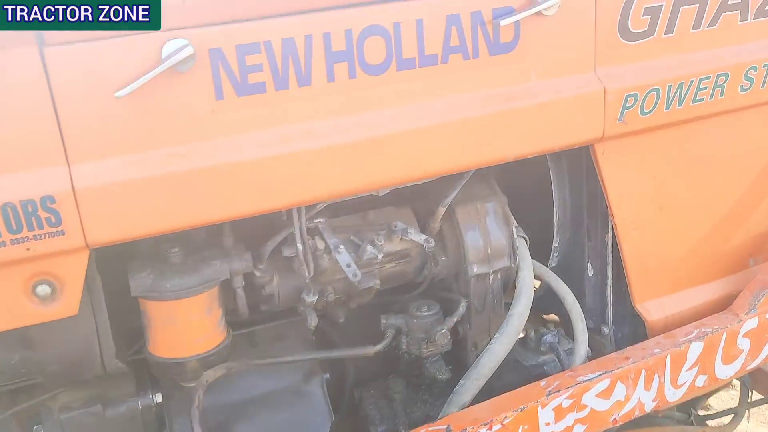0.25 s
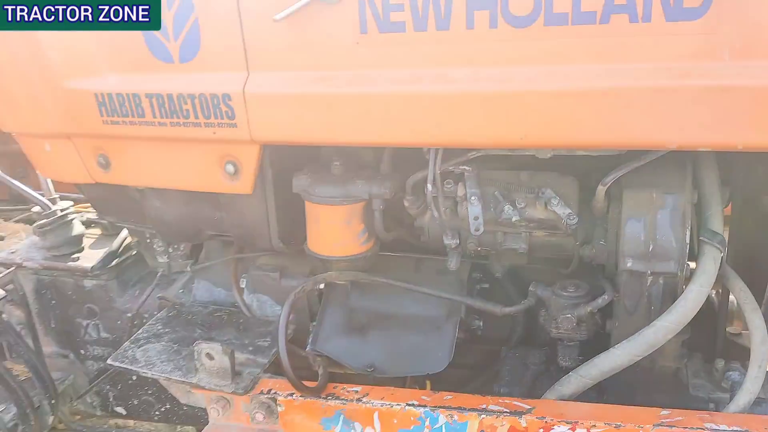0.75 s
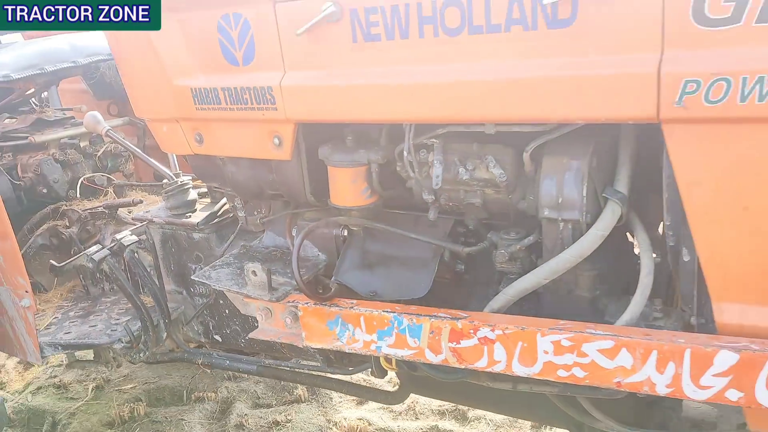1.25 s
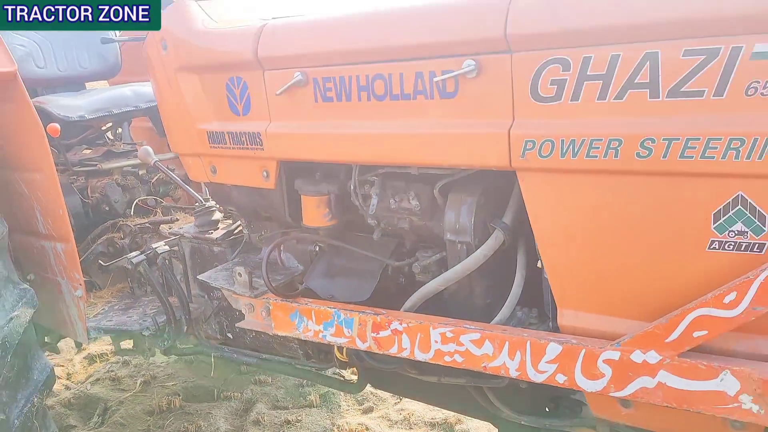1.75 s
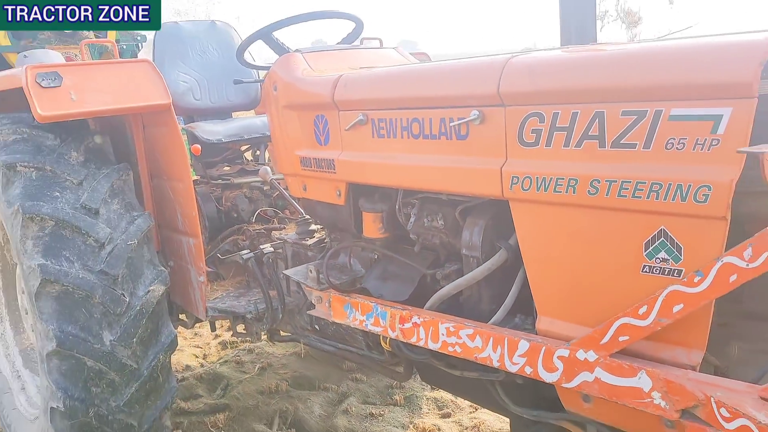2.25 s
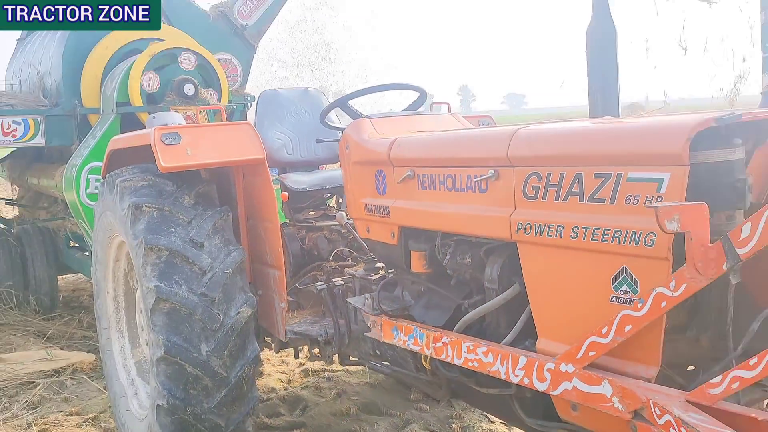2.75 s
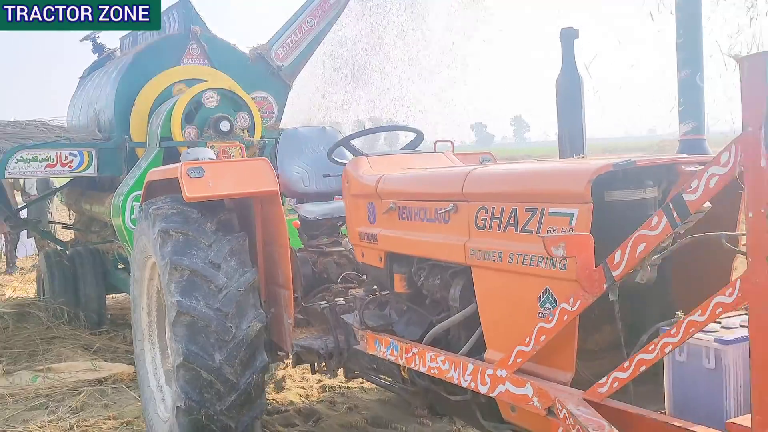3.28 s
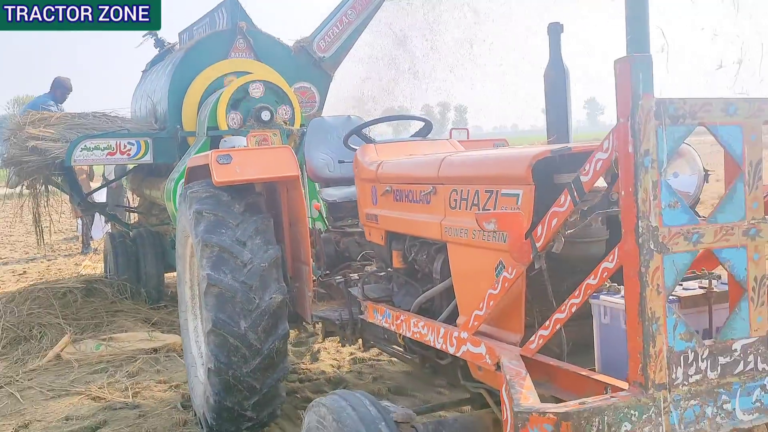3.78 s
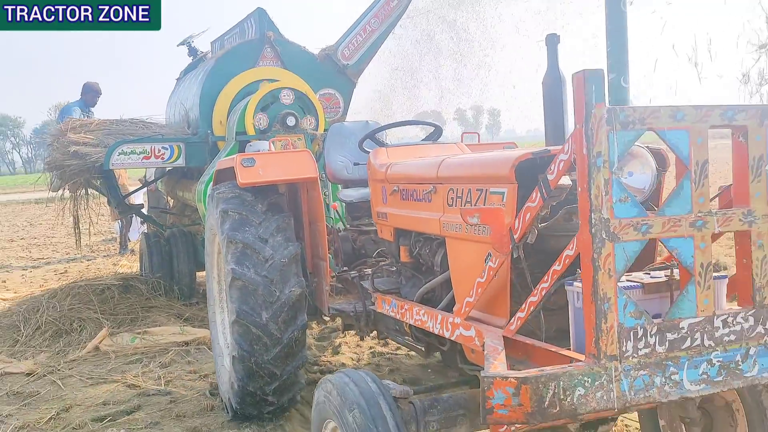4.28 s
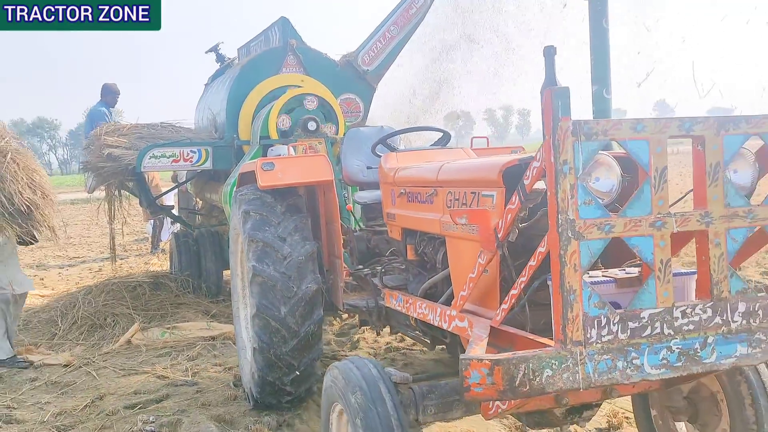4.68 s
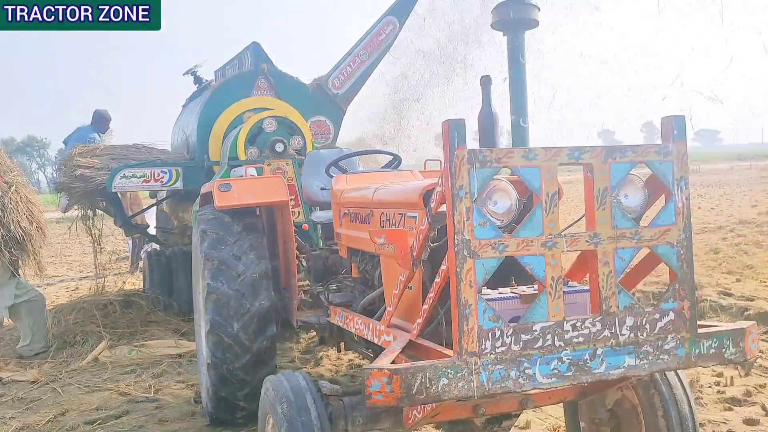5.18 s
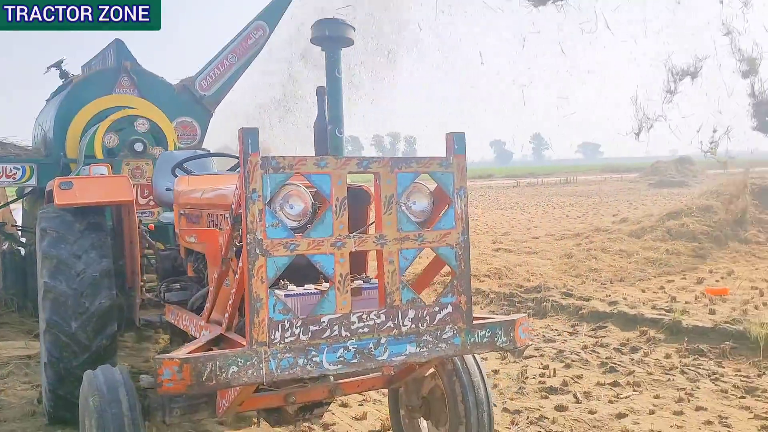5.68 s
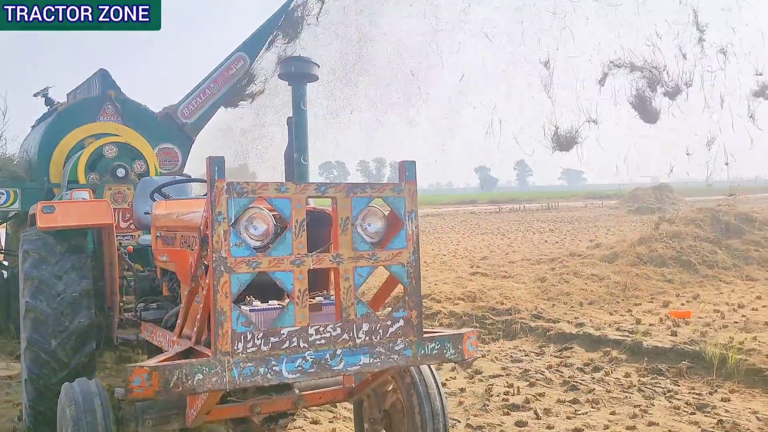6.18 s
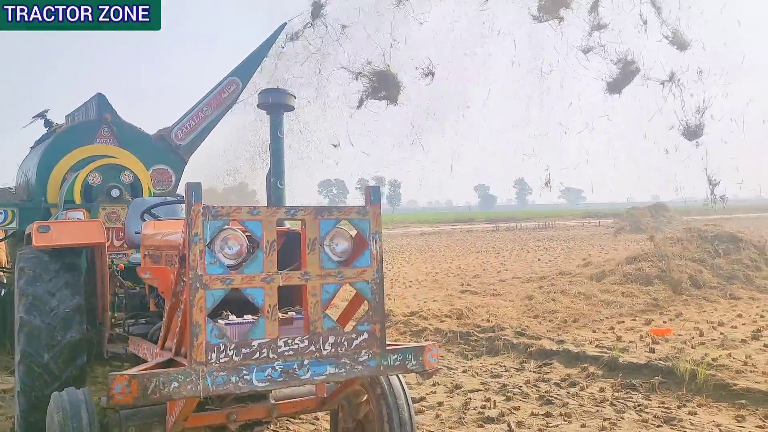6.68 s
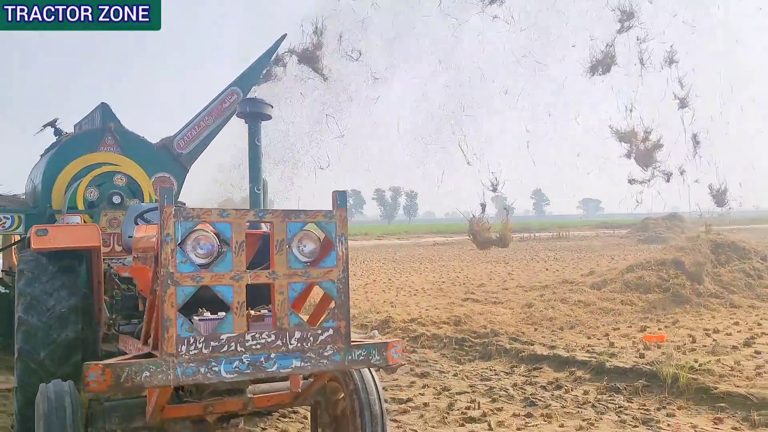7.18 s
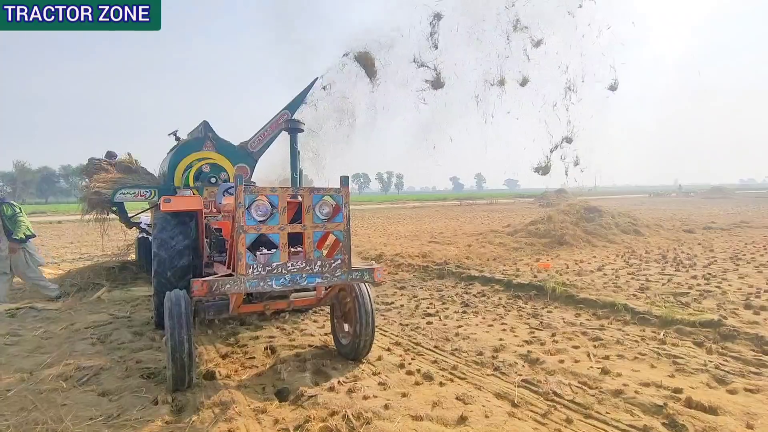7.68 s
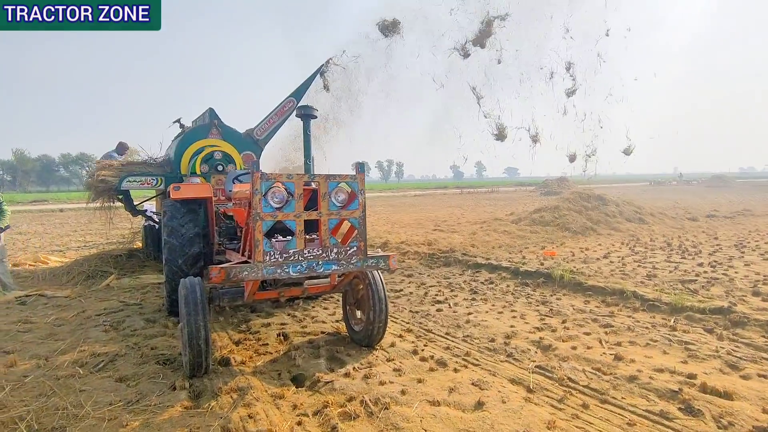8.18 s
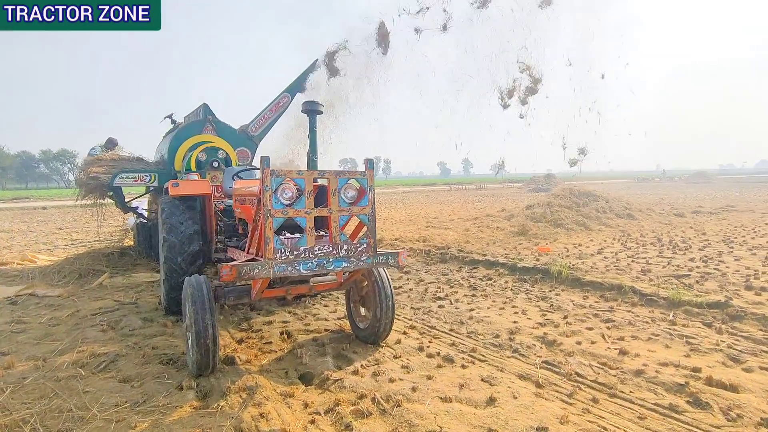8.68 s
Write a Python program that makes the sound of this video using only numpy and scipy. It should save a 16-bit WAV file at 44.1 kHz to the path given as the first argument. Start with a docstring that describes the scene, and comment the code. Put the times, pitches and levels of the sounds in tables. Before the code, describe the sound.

A hard-working diesel engine, heard close at its flank, hammers out rapid uneven firings with metallic rattle and hissing air. After about four seconds the pitch begins to sag and the throb gets heavier as the listener rounds the front. Further off, the sound narrows towards one spot, knocks still hard, with the thresher's rushing straw and rumble continuing. Dry open field, small handheld stereo microphone.

```python
"""A throbbing engine slows under growing load, with knocks, clatter and a rush of straw and air around it.
A three-cylinder diesel tractor drives a paddy thresher in an open field. Each firing gives a harmonic exhaust
pulse, a knock ringing in the block and a burst of rattle; gears, valve gear and fan turn with the crank.
Shaped noise makes the rush and the drum's rumble. The listener walks from the engine's flank round to the
front and away, so the colour drifts; the microphone is small and has two ports."""
import sys
import numpy as np
from scipy import signal
from scipy.fft import rfft, irfft, next_fast_len
from scipy.io import wavfile
from scipy.ndimage import uniform_filter1d, map_coordinates

SR = 44100
rng = np.random.default_rng(int(sys.argv[2]) if len(sys.argv) > 2 else 0)


def transcribe(signal):
    """Save signal, clipped to [-1, 1], as a 16-bit WAV file at the path in sys.argv[1]."""
    frames = np.atleast_2d(signal).T
    limited = np.clip(frames, -1, 1)
    pcm = np.round(limited * 32767).astype(np.int16)
    wavfile.write(sys.argv[1], SR, pcm)


def ratio(d):
    """dB to gain"""
    e = np.asarray(d, float) / 20
    return 10 ** e


N = 394254  # samples


def unit(x):
    """Normalisation: scaled to rms 1."""
    return x / np.sqrt(np.mean(x ** 2) + 1e-20)


def along(points, hz):
    """Interpolation of (Hz, value) points on a logarithmic frequency axis."""
    f, v = np.transpose(points)
    return np.interp(np.log(hz + 1), np.log(f + 1), v)


def curves(rows):
    """Linear interpolation in time: one value per sample for each column after the time."""
    s, *cols = np.transpose(rows)
    return [np.interp(np.arange(N) / SR, s, c) for c in cols]


def wobble(rate):
    """Band-limited fluctuation: a smooth random curve with rate knots a second."""
    knots = rng.standard_normal(int(N * rate / SR) + 4)
    return map_coordinates(knots, [np.arange(N) * rate / SR])


def filtered(x, response):
    """Linear filtering: the spectrum of x times a complex response of frequency."""
    m = next_fast_len(N + 8192)
    return irfft(rfft(x, m) * response(np.fft.rfftfreq(m, 1 / SR)), m)[..., :N]


def hiss(patchy_db):
    """Non-stationary noise: two unrelated noises whose time-frequency patches share random gains."""
    z = signal.stft(rng.standard_normal((2, N + 512)), nperseg=512)[2]
    field = rng.standard_normal(z.shape[1:])
    field = uniform_filter1d(uniform_filter1d(field, size=4, axis=0), size=10, axis=1)
    return signal.istft(z * ratio(patchy_db * unit(field)), nperseg=512)[1][:, :N]


# The listener's walk. Each row: time in seconds, place from 0 to 5. Place 0 is close to the block,
# 1 a step back, 2 beside the bonnet, 3 the front corner, 4 ahead, 5 further off.
WALK = [(0, 0), (1.2, 0.5), (3.7, 2.0), (4.4, 3), (5.5, 3), (6.2, 4.5), (8.94, 5.0)]


def listener_place():
    """Kinematics of the listener: the place along the walk at every sample."""
    return curves(WALK)[0]


def at_place(rows):
    """Position-dependent radiation: each column after the place, read along the walk."""
    place, *cols = np.transpose(rows)
    return [np.interp(listener_place(), place, c) for c in cols]


# Slowing under load. Each row: time in seconds, firing rate in Hz.
FIRING_RATE = [(0.0, 59.29), (0.3, 58.41), (1.0, 57.51), (1.72, 57.84), (2.05, 58.27), (2.86, 57.89),
               (3.83, 58.46), (4.63, 55.68), (5.51, 55.27), (6.05, 52.67), (6.7, 51.87), (7.2, 51.01),
               (8.94, 50.13)]


def crank():
    """Phase is the integral of frequency: the running count of firings, three to an engine cycle."""
    first_firing = -.065  # count at the start
    return first_firing + np.cumsum(curves(FIRING_RATE)[0]) / SR


# Combustion along the walk. Each row: place, knock hardness in dB, knock delay in firing periods.
LOAD = [(0, -4, -0.0045), (2, 0, -0.022), (3, 0, -0.00024), (4, 0.5, .03), (5, 1.5, .037)]


def load():
    """Load alters combustion: hardness of the knock in dB and its delay in firing periods."""
    return at_place(LOAD)


# Each cylinder's mean knock level in dB.
CYLINDER_KNOCK_DB = [.4, 1, -1.2]
# Unusually hard or soft firings. Each row: time in seconds, dB against an ordinary firing.
UNUSUAL_BLOWS = [(1.297, 3.5), (4.959, 4), (5.813, 3.5), (5.831, 3), (6.246, -6), (6.826, -7), (7.39, 4),
                 (8.278, 5), (8.456, 3.5), (8.496, 4)]


def strength(count):
    """Cycle-to-cycle variation: a random level in dB for every firing, held until the next, plus the load."""
    k = np.floor(count).astype(int) + 1
    firings = k.max() + 1
    level = .6 * rng.standard_normal(firings) + np.resize(np.roll(CYLINDER_KNOCK_DB, 1), firings)
    for s, db in UNUSUAL_BLOWS:
        level[k[round(s * SR)]] = db
    return level[k] + load()[0]


# Band levels before their random swings. Each row: time in seconds, clatter in dB, treble hiss in dB.
NOISE = [(0.2, -28, -25.5), (0.9, -32.5, -25.5), (1.55, -31.5, -28.5), (2.1, -30.5, -25.5),
         (3.4, -30.5, -24), (3.96, -32.5, -27.5), (4.1, -30, -23), (4.7, -33.5, -23.5), (5.05, -31, -27.5),
         (5.8, -31.5, -32.5), (6.6, -31.5, -27.5), (7.7, -33, -28.5), (8.44, -31.5, -23.5),
         (8.9, -31.5, -26)]


def bands():
    """Band levels in dB of body, clatter and hiss: the body follows part of the clatter's swings."""
    body_db, follows = -23.5, 0.4
    clatter_db, hiss_db = curves(NOISE)
    return body_db + follows * (clatter_db - clatter_db.mean()), clatter_db, hiss_db


# Spectrum of the rumble. Each row: frequency in Hz, relative density in dB per Hz.
RUMBLE = [(15, -36), (25, -8), (48, -0.5), (281, -3.5), (316, -17.5), (420, -16), (550, -47), (920, -120)]


def drum():
    """Low-passed structural noise: the rumble of the threshing drum and chassis."""
    uneven_db = .6 * wobble(6)
    rumble = unit(filtered(hiss(patchy_db=-0.8), lambda f: ratio(along(RUMBLE, f))))
    return ratio(-26.0 + uneven_db) * rumble


# Resonances of the engine block. Each row: frequency in Hz, width in Hz, relative peak in dB.
BLOCK = [(337, 72, -8), (670, 119, 3.5), (860, 100, 7), (960, 370, -1.5), (1330, 158, 2.9), (1780, 470, -5),
         (3056, 610, -8.5), (7130, 1230, -0.5)]


def block(f):
    """Modal superposition: the causal response of the block's resonances, with alternating signs."""
    return sum((-1) ** k * ratio(db) * 1j * f * w / (c * c - f * f + 1j * f * w)
               for k, (c, w, db) in enumerate(BLOCK))


# What excites the rattle. Each row: frequency in Hz, relative density in dB per Hz.
CLATTER = [(300, -13), (1000, -1.5), (2500, 0.5)]
# The rush heard beside the engine. Each row: frequency in Hz, relative density in dB per Hz.
FLANK = [(180, -30), (320, -4), (512, -14), (1000, -7), (1160, -15), (2100, -15.5), (2580, -12),
         (3300, -16), (4570, -21), (7280, -7.5), (7900, -20)]
# The rush heard in front of the tractor. Each row: frequency in Hz, relative density in dB per Hz.
FRONT = [(180, -27), (300, -3.5), (400, -13), (580, -7.5), (897, -8.5), (1800, -15), (2580, -12.5),
         (3200, -21), (5400, -17.5), (6650, -6.5), (7900, -19.5)]


def machinery(count, blow_db):
    """Gated resonance over turbulence: rattle rings after each firing amid the rush of straw and fan air."""
    edges = [lambda f: 1 / (1 + (f / 2400) ** 8),
             lambda f: 1 / (1 + (2400 / (f + 1)) ** 8) / (1 + (f / 5200) ** 8),
             lambda f: 1 / (1 + (5200 / (f + 1)) ** 8)]
    # dB against the rush; centre and width in firing periods
    bursts = [(-5.5, 0.21, 0.11), (-6.0, 0.25, 0.16), (0.0, 0.21, 0.17)]
    turn_place, turn_span = 3.1, 0.92  # where the front colour begins to take over; over how many places
    front = np.clip((listener_place() - turn_place) / turn_span, 0, 1)
    hardness_db, delay = load()
    swell, out = wobble(5), 0
    for db, edge, (burst_db, centre, width) in zip(bands(), edges, bursts):
        u = (count % 1 - centre - delay) / width
        burst = unit(np.exp(-u ** 2 * np.where(u < 0, 1, .45)))  # dies slower than it rises
        rattle = hiss(patchy_db=1.76) * burst
        ringing = unit(filtered(rattle, lambda f: (0.21 + block(f)) * edge(f) * ratio(along(CLATTER, f))))
        air = hiss(patchy_db=1.5)
        beside, ahead = (unit(filtered(air, lambda f: ratio(along(c, f)) * edge(f) * (f > 260)))
                         for c in (FLANK, FRONT))
        rush = (1 - front) * beside + front * ahead
        mix = rush + ratio(burst_db + blow_db) * ringing
        mix = mix / np.sqrt(1 + ratio(burst_db + hardness_db) ** 2)
        out = out + ratio(db + .4 * swell + .45 * wobble(9)) * mix
    return out


# Mean level of the blade tone. Each row: place, rms level in dB.
FAN = [(0, -41.5), (1.3, -33), (3, -35)]


def fan(count):
    """Blade-pass tone: the belt-driven fan beats against the third multiple of the firing rate."""
    blades_per_cycle = 8.58  # blade passes per engine cycle
    level = ratio(at_place(FAN)[0] + 5.7 * wobble(2.4))
    return level * np.sqrt(2) * np.sin(2 * np.pi * blades_per_cycle * count / 3)


# Tones locked to the crank. Each row: periods per engine cycle, place where loudest, mean rms level there in dB.
GEARS = [(11, .3, -34), (11, 1.3, -32.5), (10, .7, -33), (10, 1.6, -34), (52, .2, -34.5), (52, 1.3, -37),
         (45, 1.7, -35.5), (30, 1.95, -36), (42, 3, -36), (38, 4.5, -31.5), (52, 5, -32), (29, 5, -37)]


def gears(count):
    """Tooth-mesh excitation: slightly unsteady tones locked to the crank, each heard around one place."""
    place, beam = listener_place(), 0.25  # spread of a tone in places
    out = 0
    for teeth, best, db in GEARS:
        level = ratio(db + 2 * wobble(2.5)) * np.exp(-((place - best) / beam) ** 2 / 2)
        turns = teeth * count / 3 + .03 * wobble(5)
        out = out + level * np.sqrt(2) * np.sin(2 * np.pi * turns)
    return out


# Spectrum of the valve gear. Each row: frequency in Hz, relative density in dB per Hz.
LINKAGE = [(150, -41), (260, -4.5), (380, 1), (500, -6), (650, 0), (1000, -3), (1500, -1), (2200, -32.5),
           (4000, -55)]


def linkage(count):
    """Cyclostationary noise: valves, rods and pump rattle in a slowly drifting pattern each engine cycle."""
    steps, memory = 256, 7  # knots per engine cycle; engine cycles over which the pattern changes
    cycle = count / 3 + 1
    knots = rng.standard_normal((2, int(cycle.max() / memory) + 3, steps))
    at = [cycle / memory, cycle % 1 * steps]
    pair = np.array([map_coordinates(k, at, mode="grid-wrap") for k in knots])
    rattle = unit(filtered(pair, lambda f: ratio(along(LINKAGE, f))))
    return ratio(bands()[0] - 4.5) * rattle  # dB against the body band


# Bonnet and guard panels. Each row: frequency in Hz, width in Hz of either of two cascaded resonators,
# place faced, spread in places, level there in dB against the clatter for an even blow.
PANELS = [(1580, 700, 0.34, .3, 3.5), (3385, 410, 3.25, 1.5, -6.5), (2950, 630, 4.95, 0.49, -8),
          (1772, 140, 5, 0.52, -3)]


def panels(count, blow_db):
    """Directional panel resonance: each firing rings the panels, just after a puff of exhaust noise."""
    def gated_noise(centre, width):  # firing periods
        gate = unit(np.exp(-((count % 1 - centre) / width) ** 2))
        return gate * rng.standard_normal((2, N))

    def ring(x, c, w):
        return unit(filtered(x, lambda f: (1j * f * w / (c * c - f * f + 1j * f * w)) ** 2))

    place = listener_place()
    blow = gated_noise(0.2 + load()[1], 0.16) * ratio(blow_db)
    rung = sum(ratio(db) * np.exp(-((place - best) / wide) ** 2 / 2) * ring(blow, hz, width_hz)
               for hz, width_hz, best, wide, db in PANELS)
    puff = ring(gated_noise(0.16, 0.13), 823, 520)
    body_db, clatter_db, _ = bands()
    return ratio(clatter_db) * rung + ratio(body_db - 8.5) * puff


def knock(count, blow_db):
    """Impulse response to combustion: a clack alike in all cylinders, then each one's own rattle in the block."""
    struck = count - .2 - load()[1]
    start = (np.diff(np.floor(struck), prepend=0) > 0) * ratio(blow_db)
    t = np.arange(SR // 25) / SR
    spike = np.array([[10], [0]]) * (t == 0)  # a pressure spike opens the clack
    clack = 1.1 * rng.standard_normal((2, len(t))) * ratio(-60 * t / .012) - spike  # noise falls 60 dB in 12 ms
    rattles = clack + 0.43 * rng.standard_normal((3, 2, len(t))) * ratio(-60 * t / 0.06)
    blows = 0
    for c in range(3):
        own = start * (np.floor(struck) % 3 == c)
        blows = blows + signal.fftconvolve(own[None], rattles[c], axes=1)[:, :N]

    def duller(f):
        return block(f) / (1 + 1j * f / 3300) ** 2 * (1j * f / (450 + 1j * f)) ** 2
    return unit(filtered(blows, duller)) * ratio(bands()[0] - 3.5)


# Mean levels of the exhaust throb. Each row: place, then the fundamental and the 2nd to 6th multiples in dB.
THROB = [(.25, -20.5, -17.5, -22, -32, -30.5, -35), (1, -19.5, -20, -18, -23, -40.5, -38.5),
         (2, -19.5, -22, -20, -24, -41.5, -36.5), (3, -15.5, -20, -21.5, -25.5, -32, -38.5),
         (4.5, -16, -20, -27, -30, -28, -32), (5, -16, -18.5, -27.5, -27.5, -34, -33.5)]
# Further multiples. Each row: multiple of the firing rate, dB against the 6th.
UPPER = [(7, -10)]
# Phase of the multiples. Each row: place, skew in radians (0 an even hump, 1.6 a slow rise and sharp fall).
SKEW = [(0, 1.2), (2, 1.7), (3, 1.1), (4, -.05)]
# Uneven cylinders. Each row: size in dB (the fundamental takes 0.15 of it), lateness in firing periods.
CYLINDERS = [(2.3, -0.0098), (0.2, -0.0084), (0.5, 0.0022)]
# Brief dips of the throb. Each row: time in seconds, spread (standard deviation) in seconds, depth in dB.
FALTERS = [(3.96, 0.0076, -2.5), (5.6, 0.046, -2.5), (6.19, 0.0098, -2), (7.42, 0.025, -2.5),
           (8.59, 0.0062, -6)]


def exhaust(count):
    """Fourier synthesis: multiples of the firing rate line up into one pulse, uneven between cylinders."""
    cycle = count % 3
    size_db, late = (np.interp(cycle, [0, 1, 2, 3], [*c, c[0]]) for c in np.transpose(CYLINDERS))
    angle = 2 * np.pi * (count - late + .004 * wobble(30)) - 1  # trails the fundamental's crest by a radian
    one_db, *multiples_db = at_place(THROB)
    levels = list(enumerate(multiples_db, start=2)) + [(k, multiples_db[-1] + db) for k, db in UPPER]
    skew = at_place(SKEW)[0]
    pulse = sum(ratio(db + 0.38 * wobble(12)) * np.cos(round(k) * angle + skew) for k, db in levels)
    steady = ratio(one_db + 0.15 * size_db + 1.0 * wobble(1.7)) * np.cos(2 * np.pi * count)
    t = np.arange(N) / SR
    dip_db = sum(db * np.exp(-((t - s) / wide) ** 2 / 2) for s, wide, db in FALTERS)
    return np.sqrt(2) * ratio(dip_db) * (steady + ratio(size_db + 0.11 * wobble(25)) * pulse)


# Likeness of the two ports. Each row: frequency in Hz, left-right correlation close up, correlation far off.
ALIKE = [(250, 0.86, 0.97), (600, 0.91, 0.97), (1100, 0.46, 1), (2000, .2, 0.53), (3300, 0.23, 0.5),
         (6000, .15, .25), (8000, .5, 0.37)]
# The machine shrinks to one spot with distance. Each row: place, share of the far likeness.
SHRINKS = [(0, 0), (1.2, 0.12), (4, 0.78)]


def spread(pair):
    """Interaural-style coherence: two sounds mixed to be alike in the bass, and more alike with distance."""
    hz, near, far = np.transpose(ALIKE)

    def mid_side(likeness):
        def turn(f):
            return np.arccos(np.clip(along(np.transpose([hz, likeness]), f), -1, 1)) / 2
        return np.array([filtered(pair[0], lambda f: np.cos(turn(f))),
                         filtered(pair[1], lambda f: np.sin(turn(f)))])

    share = np.clip(at_place(SHRINKS)[0], 0, 1)
    mid, side = mid_side(near) * (1 - share) + mid_side(far) * share
    return np.array([mid + side, mid - side])


# Arrival difference. Each row: place, time in ms by which the left port hears later.
LAG = [(0, -0.13), (2.8, -0.081), (3.2, -0.016), (5, 0.083)]


def scene():
    """Superposition and arrival-time difference: all sources add, and one port hears a little before the other."""
    count = crank()
    blow_db = strength(count)
    tones = exhaust(count) + gears(count) + fan(count)
    pair = np.array([tones, ratio(-14.5) * np.roll(tones, 90)])  # a faint delayed copy widens the tones
    pair = pair + knock(count, blow_db) + panels(count, blow_db) + linkage(count)
    pair = pair + machinery(count, blow_db) + drum()
    left, right = spread(pair)
    heard_at = np.arange(N) - at_place(LAG)[0] * SR / 1000
    return np.array([map_coordinates(left, [heard_at], mode="nearest"), right])


def low_pass(x):
    """Removes everything above the highest recorded frequency."""
    return signal.sosfilt(signal.butter(12, 8990, fs=SR, output="sos"), x)


# Colour of the ports. Each row: frequency in Hz, left minus right in dB.
PORTS = [(700, 0), (1160, -.5), (1900, -3), (2500, 3), (3200, 11.5), (5100, 3.5), (7000, 5), (8000, -3.5)]


def record(dry):
    """Saturation and port response: peaks are softly squeezed, each port is coloured, the treble ends early."""
    soft = dry / (1 + np.abs(dry / .95) ** 5) ** (1 / 5)

    def port_response(f):
        notch_db = -3.5 * np.exp(-((f - 2630) / 180) ** 2)  # a dip in the microphone's response
        colour_db = np.outer([.5, -.5], along(PORTS, f))
        return ratio(colour_db + notch_db) / (1 + (f / 7810) ** 120)  # band limit in Hz
    return low_pass(filtered(soft, port_response))


dry = scene()
out = record(dry)
transcribe(out)
```